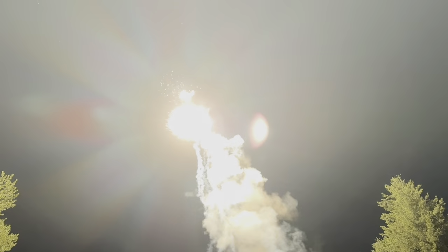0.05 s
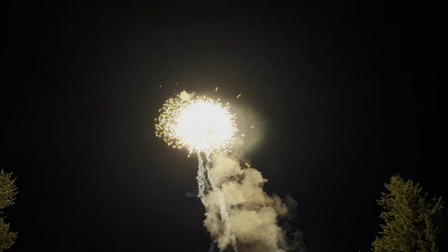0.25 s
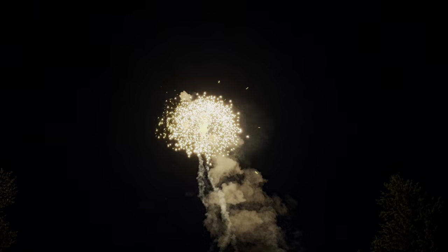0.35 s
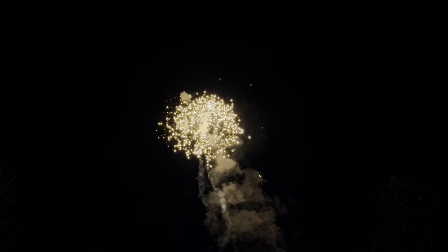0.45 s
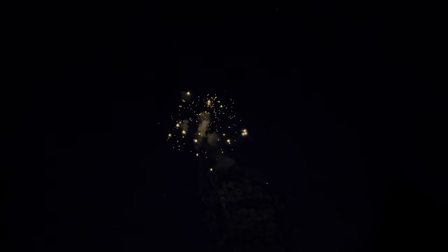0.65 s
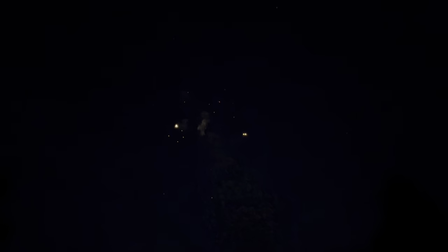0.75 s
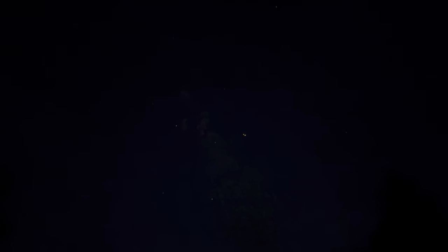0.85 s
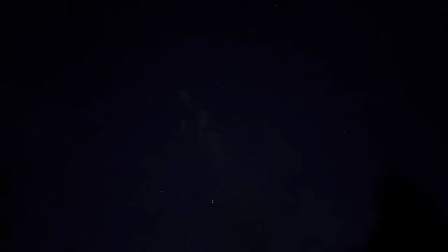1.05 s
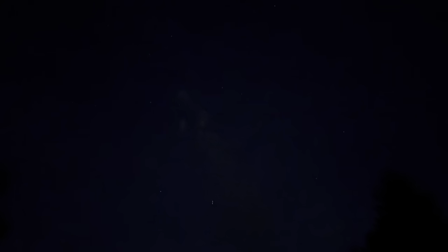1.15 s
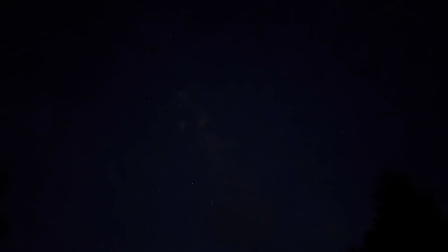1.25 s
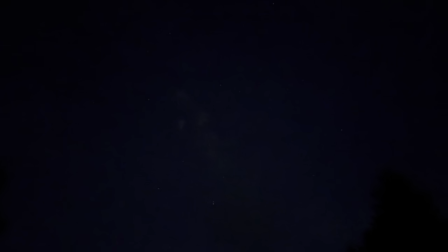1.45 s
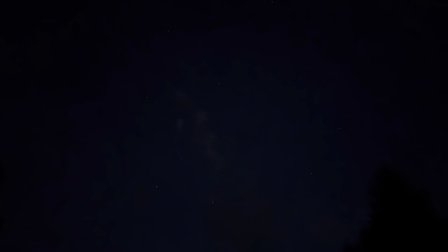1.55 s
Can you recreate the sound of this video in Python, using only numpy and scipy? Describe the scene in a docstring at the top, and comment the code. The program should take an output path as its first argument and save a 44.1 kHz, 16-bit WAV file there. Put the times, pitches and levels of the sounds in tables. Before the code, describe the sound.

Aerial fireworks burst overhead in a quick double crack, echoing and rumbling away in the open.

```python
"""Outdoors at night, among trees and far walls, with a small recorder under a firework display. The rumble of
earlier shells hangs in the air. Then two shells burst overhead, 60 ms apart; each blast arrives direct and
again off the ground. The two-port microphone delays the bass behind the treble, so each bang chirps downward.
Echoes come back off the walls, and trees and walls scatter the blasts into a lumpy rumble whose treble the air
eats as it dies away over a faint hiss."""
import sys
import numpy as np
from scipy import signal
from scipy.fft import rfft, irfft
from scipy.io import wavfile
from scipy.ndimage import uniform_filter1d

SR = 44100
rng = np.random.default_rng(int(sys.argv[2]) if len(sys.argv) > 2 else 0)


def store_wav(level_fs):
    """Save 16-bit WAV to argv[1]."""
    pcm = np.round(np.clip(np.atleast_2d(level_fs), -1, 1) * 32767)
    wavfile.write(sys.argv[1], SR, pcm.T.astype(np.int16))


N = 70560
FFT_SIZE = 2 ** 17
HZ = np.arange(FFT_SIZE // 2 + 1) * SR / FFT_SIZE
SIDES = np.array([[.5], [-.5]])  # splits a left-minus-right difference (pan, lag) between the channels

# Spectra of a shock front's mid crack, sharp top edge and low thump: pitch_hz, level_db
CRACK_SPECTRUM = [(500, 2), (800, 3), (1150, 3), (1600, 0), (2200, -5), (2800, -11.5), (3500, -25)]
SNAP_SPECTRUM = [(2500, -34), (3400, -6.5), (4800, -1), (6000, -9), (8500, -9), (11200, -6.5),
                 (14800, -18.5), (16500, -33)]
THUMP_SPECTRUM = [(30, -20.5), (60, -0.5), (120, 1.5), (220, 4), (330, 2), (420, -21.5), (600, -43.5)]
def shock_front():
    """A shell's pressure pulse as four spectra: crack, snap, body and thump."""
    crack = undb(over_hz(CRACK_SPECTRUM, HZ)) * np.minimum(HZ / CRACK_SPECTRUM[0][0], 1) ** 2
    snap = undb(over_hz(SNAP_SPECTRUM, HZ)) * np.minimum(HZ / SNAP_SPECTRUM[0][0], 1) ** 2
    body = np.exp(-.5 * (np.log2(np.maximum(HZ, 1) / 580) / .28) ** 2)  # a narrow knock at 580 Hz
    thump = undb(over_hz(THUMP_SPECTRUM, HZ))
    return [unit_pulse(gain) for gain in (crack * (HZ < 4000), snap, body, thump * (HZ < 900))]


# Each burst reaching the microphone: start_s, left_lag_ms, thump_delay_ms, thump_left_lag_ms
BURST_ARRIVALS = [(.22098, .05, .4, .4), (.27984, -.03, 1.48, -.2)]
# Strength of each burst: crack_db, snap_db, body_db, thump_db, then pan_db for each of the four
BURST_LEVELS = [(5, 8, -15, 2.5, -4.5, 3.7, -11, 9), (6, 5.5, -44, 8, -2.5, 2, 2, 1.5)]
GROUND_DELAY_S = .00905
def shell_bursts():
    """Overhead: each shock front comes straight down to the microphone, then again off the ground."""
    crack, snap, body, thump = shock_front()
    crack = crack * (1 + undb(-16.5) * delay(.00175))  # bounce off something within arm's reach
    bounces = [1 + undb(db) * delay(GROUND_DELAY_S) for db in (-12, -16, -22.5, -8)]  # one for each part
    spectrum = 0
    for (start_s, lag_ms, thump_delay_ms, thump_lag_ms), levels in zip(BURST_ARRIVALS, BURST_LEVELS):
        blur = smear(decay_ms=.35)[0]  # the sharpest edge arrives ragged, alike in both channels
        parts = crack, snap * blur / (abs(blur) + .5), body, thump
        delays_ms = 3 * [SIDES * lag_ms] + [thump_delay_ms + SIDES * thump_lag_ms]
        for part, bounce, db, pan_db, ms in zip(parts, bounces, levels[:4], levels[4:], delays_ms):
            spectrum += part * bounce * undb(db + pan_db * SIDES) * delay(start_s + ms / 1000)
    return to_sound(spectrum)


# Single reflections off walls: start_s, crack_db, body_db, thump_db, pan_db
WALL_ECHOES = [(.308, -36, -42, -20.5, 0), (.3235, -41, -22.5, -24.5, -12.5), (.334, -36, -24, -33, -4),
               (0.479, -41, -35.5, -24, -6), (0.498, -15.5, -24, -10, 2.5), (.565, -19, -20, -26.5, 0.5),
               (.636, -27.5, -24, -19, -4), (.665, -19.5, -42, -26, 3), (.684, -17.5, -46, -20, -4.5),
               (.757, -21, -32, -21.5, -2), (0.828, -31, -37, -31.5, -1.5), (.85, -21, -35, -33.5, -3),
               (.871, -37, -27, -33, 6), (.891, -43, -57, -33, 0), (.962, -30, -33, -34, -6.5)]
def wall_echoes():
    """Far walls return the blast: rough surfaces smear all but the thump, and the air dulls the crack."""
    crack, snap, body, thump = shock_front()
    spectrum = 0
    for start_s, crack_db, body_db, thump_db, pan_db in WALL_ECHOES:
        dulling = undb(-air_loss_db(2 * HZ, start_s - BURST_ARRIVALS[1][0]))
        edge = (crack + snap / 2) * dulling * undb(crack_db)
        smeared = (edge + body * undb(body_db)) * smear(decay_ms=4.5)
        spectrum += (smeared + thump * undb(thump_db)) * undb(pan_db * SIDES) * delay(start_s)
    return to_sound(spectrum)


# Rumble of the earlier shells: time_s, level_db, bass_offset_db, treble_offset_db
EARLIER_RUMBLE = [(0.01, -34, 8, -12), (0.03, -37.5, 10.5, -8.5), (0.174, -40, 0.5, -14.5),
                  (0.18, -46.5, 7.5, -5.5), (0.19, -35.5, 2.5, -14.5)]
# Rumble of the two bursts, in four consecutive stretches of rows with the same columns
BURST_RUMBLE = [
    [(0.25, -31.5, 11, -4), (0.264, -32, 6.3, -6.5)],
    [(0.32, -31, 14, -7), (0.326, -32.5, 8.3, -4.5), (0.348, -36.5, 12, -4.5), (0.422, -32.5, 6.9, -5.5),
     (0.482, -35, 10, -7), (0.606, -40.5, 4, -8.5), (0.72, -40.5, 6.3, -11.5)],
    [(0.74, -37.5, 1.5, -16.5), (0.746, -37, 3, -13.5), (0.834, -42.5, 4.5, -11.5), (0.874, -39.5, 0, -17),
     (0.882, -42, 1.5, -11), (0.932, -44.5, 4, -13.5), (1.0, -46.5, 4.5, -14)],
    [(1.05, -49.5, 0, -14.5), (1.128, -54.5, 6, -11), (1.148, -53, -3, -15.5), (1.178, -57, 8, -11),
     (1.232, -57.5, 7, -11.5), (1.52, -66.5, 8.5, -11.5), (1.54, -65.5, 6.5, -11.5)],
]
# Colour of the scattered sound before air loss: pitch_hz, density_db
RUMBLE_SPECTRUM = [(32, -27.5), (48, -20), (70, -6), (150, -1), (240, 2), (330, -3.5), (430, -1.5),
                   (600, 0.5), (1200, -6.5), (2000, -3), (3000, -7.5), (5000, -10.5), (8000, -9.5),
                   (10000, -17.5), (12000, -14.5), (14800, -19.5), (15800, -30), (17000, -50)]
# How alike the rumble is in left and right: pitch_hz, correlation
STEREO_LIKENESS = [(60, 0.92), (130, 0.96), (290, 0.75), (640, 0.27), (1410, 0.01), (3100, 0.35),
                   (6820, 0.28), (15000, 0.24)]
def scattered_rumble():
    """Trees and far walls all around scatter the blasts into lumpy noise, built in third-octave bands."""
    t = np.arange(N) / SR
    first_s, second_s = (arrival[0] for arrival in BURST_ARRIVALS)
    earlier_age_s, age_s = t + .29, np.maximum(t - second_s, 0)
    # the new rumble takes over partly at the first crack, fully once the ground bounce has passed
    after_bounce = np.clip((t - first_s - GROUND_DELAY_S) / .003, 0, 1)
    takeover = (t > first_s) * undb(-3.5) + after_bounce * (1 - undb(-3.5))
    deep_db = 8.5 * np.exp(-age_s / .11)  # the deepest bass rolls on after a burst
    noise = rfft(rng.standard_normal((2, FFT_SIZE))) * undb(over_hz(RUMBLE_SPECTRUM, HZ))
    shared_lumps, neighbour_lumps = wander(25), wander(14)
    rumble = 0
    for hz in 40 * 2 ** (np.arange(27) / 3):
        band = np.cos(np.pi / 2 * np.clip(3 * np.log2(np.maximum(HZ, 1) / hz), -1, 1))
        mid, side = to_sound(noise * band) * np.sqrt(SR / 2000)
        likeness = over_hz(STEREO_LIKENESS, hz)
        stereo = np.sqrt(1 + likeness) * mid + np.sqrt(1 - likeness) * side * 2 * SIDES
        earlier_db = band_level_db(EARLIER_RUMBLE, hz, t) - air_loss_db(hz, earlier_age_s)
        burst_db = band_level_db(np.concatenate(BURST_RUMBLE), hz, t) - air_loss_db(hz, age_s)
        burst_db += (hz < 130) * deep_db
        envelope = (1 - takeover) * undb(earlier_db) + takeover * undb(burst_db)
        neighbour_lumps = .8 * neighbour_lumps + .6 * wander(12)  # partly follows the band below
        flicker_db = .65 * shared_lumps + .76 * neighbour_lumps + .44 * wander(43)
        rumble += stereo * undb(flicker_db) * envelope
    return rumble


def band_level_db(curve, hz, t):
    """One band's level along a rumble curve, with its share of the bass and treble offsets."""
    time_s, level_db, bass_db, treble_db = np.array(curve).T
    bass_share = over_hz([(330, 1), (450, 0)], hz)
    treble_share = over_hz([(1200, 0), (2200, 1)], hz)
    return np.interp(t, time_s, level_db + bass_share * bass_db + treble_share * treble_db)


# Relative absorption by the air, negative where the sound lingers: pitch_hz, loss_db_per_s
AIR_ABSORPTION = [(60, -13), (3000, -3.5), (4500, 5.5), (6000, 13), (9000, 35), (15000, 75.5)]
def air_loss_db(hz, travel_s):
    """The farther sound travels, the more treble the air takes."""
    return over_hz(AIR_ABSORPTION, hz) * travel_s


def hiss():
    """Faint, steady white noise behind everything."""
    return undb(-95.5) * rng.standard_normal((2, N))


def smear(decay_ms):
    """Spectrum of a short random burst for each channel: what rough surfaces make of a click."""
    fade = np.exp(-np.arange(1024) / SR * 1000 / decay_ms)
    return rfft(rng.standard_normal((2, 1024)) * fade / np.linalg.norm(fade), FFT_SIZE)


def wander(rate_hz):
    """Random levels held for 1 / rate_hz seconds and smoothed twice; spread near 1."""
    hold = int(SR / rate_hz)
    steps = np.repeat(rng.standard_normal(N // hold + 1), hold)
    return 1.247 * uniform_filter1d(uniform_filter1d(steps, hold), hold)[:N]


def over_hz(table, hz):
    """Read (pitch_hz, value) points on a log frequency axis."""
    pitch_hz, values = np.array(table, float).T
    return np.interp(np.log(np.maximum(hz, 1)), np.log(pitch_hz), values)


def unit_pulse(gain):
    """Scale a spectrum so that its pulse peaks at 1."""
    return gain * FFT_SIZE / (2 * gain.sum())


def delay(seconds):
    return np.exp(-2j * np.pi * HZ * seconds)


def to_sound(spectrum):
    return irfft(spectrum, FFT_SIZE)[:, :N]


def undb(db):
    return 10 ** (np.asarray(db) / 20)


def scene():
    """What reaches the microphone, from overhead to the far background."""
    return shell_bursts() + wall_echoes() + scattered_rumble() + hiss()


def record(dry):
    """The two-port microphone delays the bass behind the treble; the recorder rounds the peaks and cuts the
    top."""
    lag_cycles, lag_top_hz = 1.25, 3000  # each pitch is this many cycles late; equal delay above the top
    lag_curve = np.log(np.clip(HZ, 20, lag_top_hz) / 16000) + np.maximum(HZ / lag_top_hz - 1, 0)
    phase_rad = 2 * np.pi * lag_cycles * lag_curve + 2.6
    lagged = to_sound(rfft(dry, FFT_SIZE) * np.exp(-1j * phase_rad))
    top_cut = signal.ellip(8, .2, 70, 16500, fs=SR, output="sos")
    return signal.sosfilt(top_cut, np.tanh(.5 * lagged) / .78)


dry = scene()
out = record(dry)
store_wav(out)
```